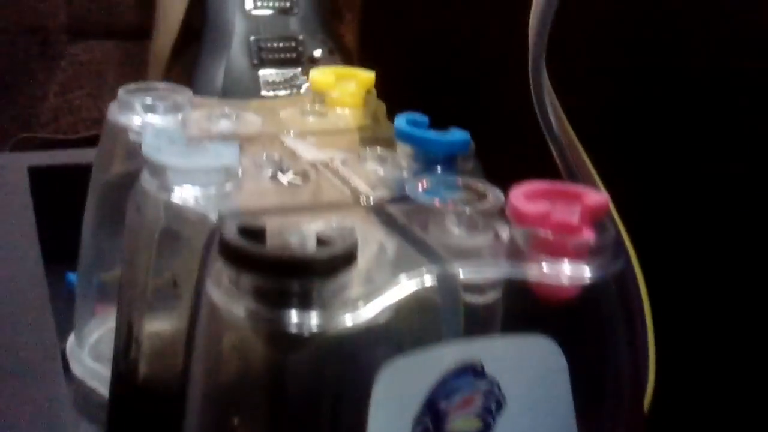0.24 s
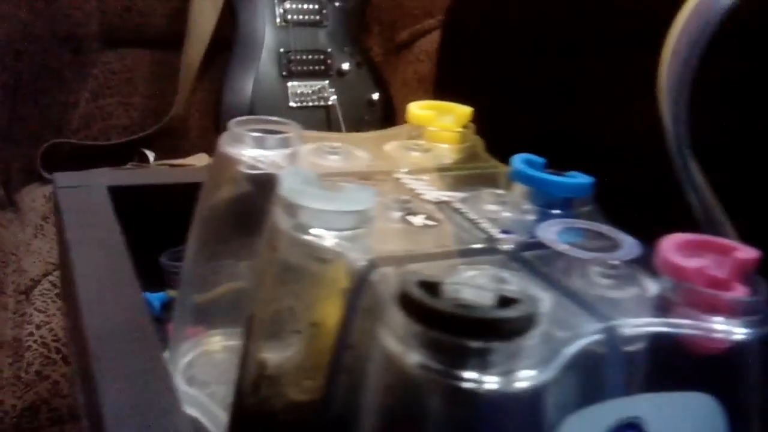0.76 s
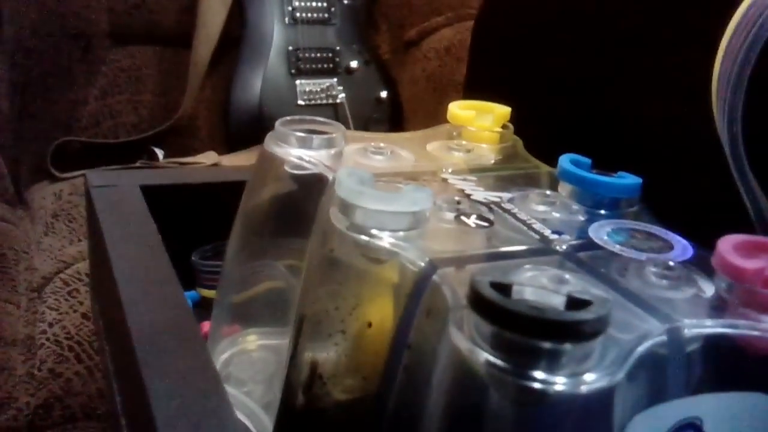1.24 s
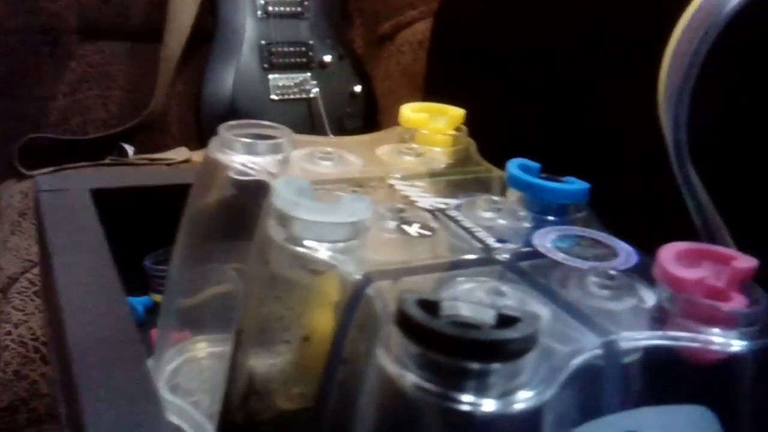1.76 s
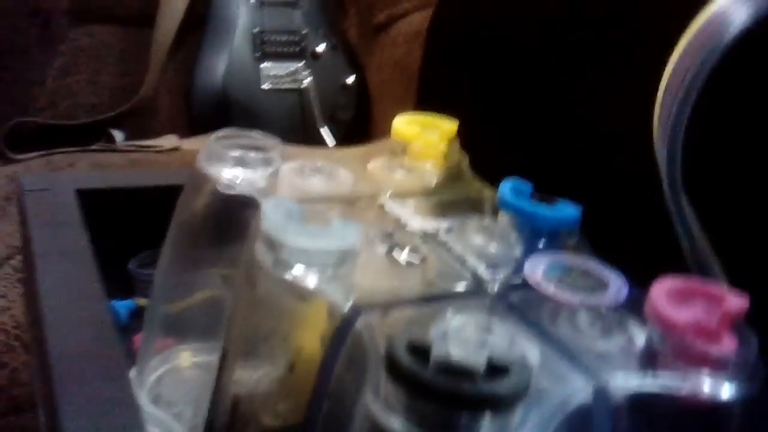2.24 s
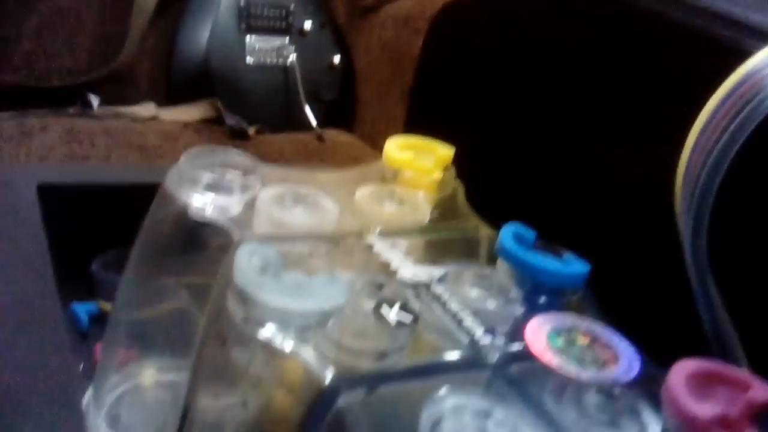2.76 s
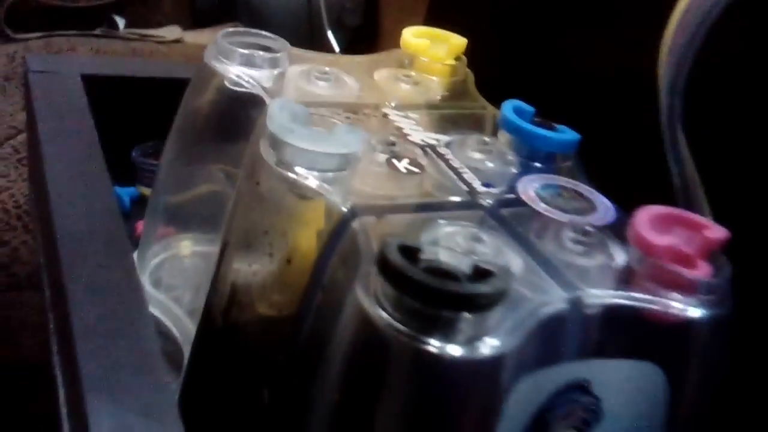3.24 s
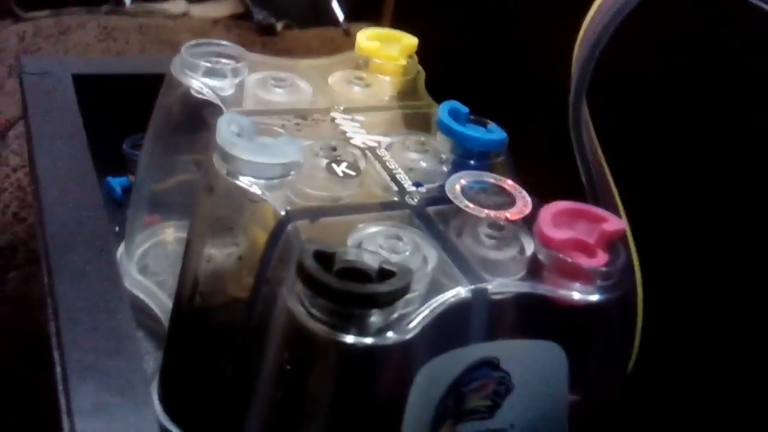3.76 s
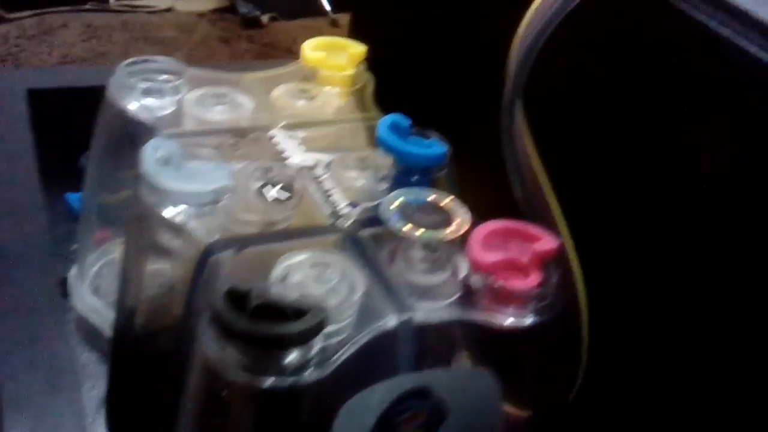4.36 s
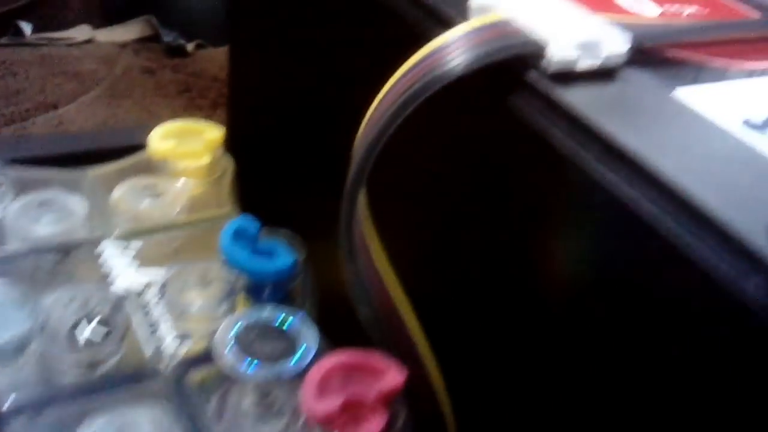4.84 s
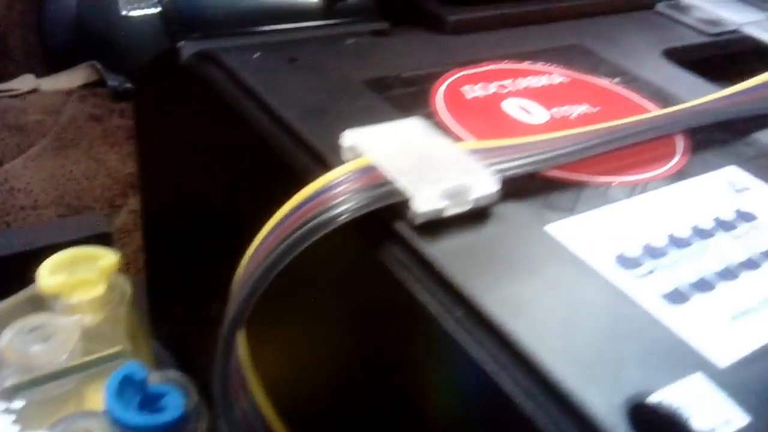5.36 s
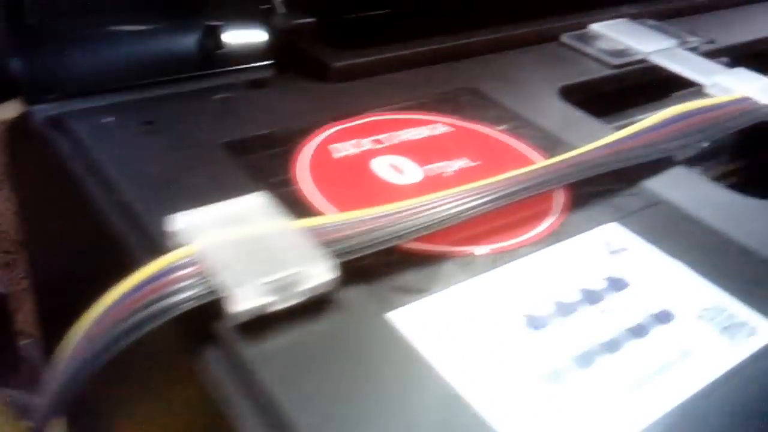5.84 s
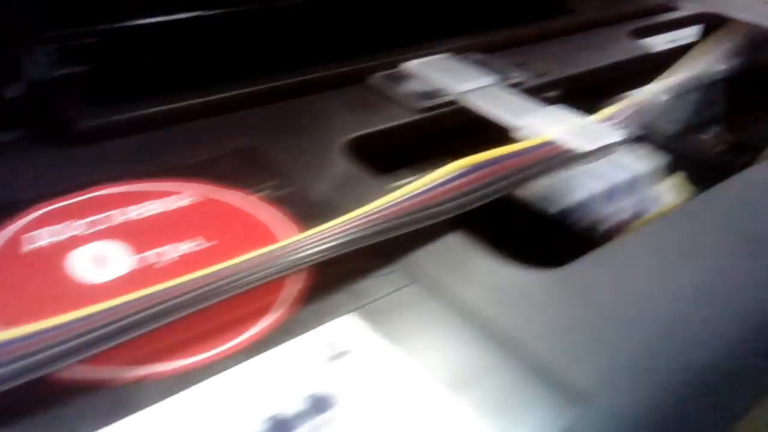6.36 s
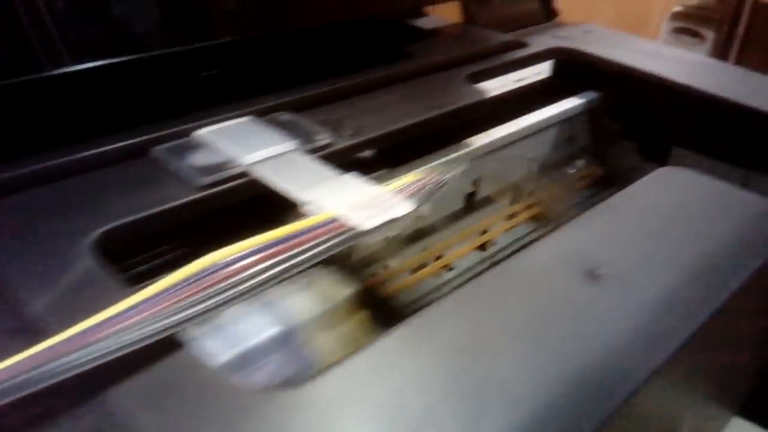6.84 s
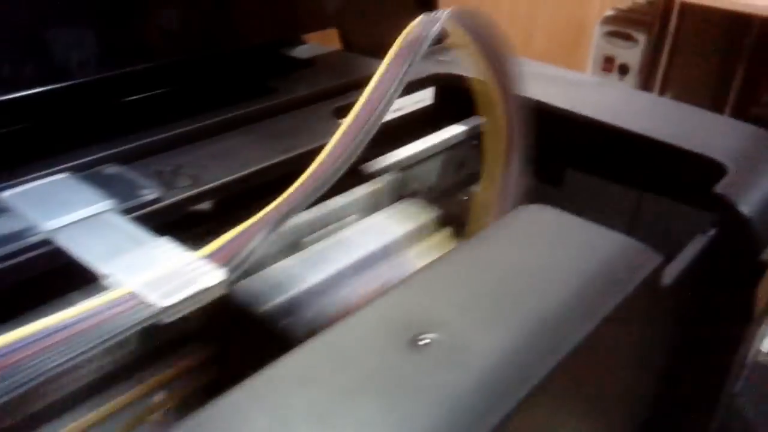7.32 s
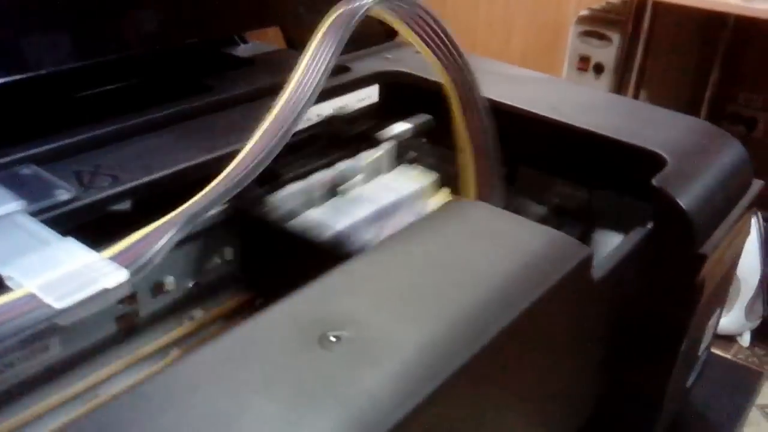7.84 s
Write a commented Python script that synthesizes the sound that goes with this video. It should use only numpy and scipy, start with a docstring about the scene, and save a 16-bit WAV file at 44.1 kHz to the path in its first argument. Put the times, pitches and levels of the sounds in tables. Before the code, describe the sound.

Sharp plastic knocks, hissing rail and whining toothed belt repeat about every two thirds of a second as a printer carriage shuttles, with one short rest.

```python
"""An inkjet printer on a wooden table, heard from close by in a small room; the microphone drifts over its open top.
Each cycle the paper steps on with a chirp, the carriage runs out with a hard knock and a rebound, brakes,
turns, and slides back more slowly. Blows ring decaying casing and carriage modes; the rail hisses as shaped
noise, the toothed belt whines in partials that follow the carriage speed, and the drive rumbles when jolted.
Once the carriage rests, and only a faint hum and low room noise are left."""
import sys
import numpy as np
from scipy import signal
from scipy.fft import rfft, irfft, next_fast_len
from scipy.io import wavfile
from scipy.ndimage import uniform_filter1d

SR = 44100
rng = np.random.default_rng(int(sys.argv[2]) if len(sys.argv) > 2 else 0)


def transcribe(signal):
    """Save signal, clipped to [-1, 1], as a 16-bit WAV file at the path in sys.argv[1]."""
    frames = np.atleast_2d(signal).T
    limited = np.clip(frames, -1, 1)
    pcm = np.round(limited * 32767).astype(np.int16)
    wavfile.write(sys.argv[1], SR, pcm)


N = 356769
TIME = np.arange(N) / SR

# print cycles, timed by the knock on the way out: knock_s, knock_db, carriage_ring_hz,
# crack_db (relative to the knock), chirp_db, brake_db, catch_db; each sound adds its own gain
CYCLES = [(-.0135, -8, 1990, -18, -38, -34, -31.5), (.665, -8, 2000, -15, -32, -33.5, -25.5),
          (1.347, -8.5, 1990, -13, -39, -32, -27), (2.0274, -7, 1990, -5.5, -43.5, -32, -27),
          (2.708, -6, 1971, -8, -44.5, -31.5, -21.5), (3.9302, -6.5, 1976, -2.5, -61, -27, -20),
          (4.609, -8, 1960, -4, -47, -30, -21.5), (5.2903, -7, 1970, -9, -41.5, -29.5, -23),
          (5.971, -7.5, 1868, -7, -44, -29, -24.5), (6.6519, -7.5, 1876, -14, -46, -30, -25.5),
          (7.3329, -9, 1890, -3.5, -54, -30, -24.5), (8.0135, -11, 1744, -23, -51, -28.5, -26)]
# ringing modes of the plastic casing: pitch_hz, level_db, t60_s
CASING_MODES = [(192.7, -13, 0.25), (266.4, -13, 0.21), (319, -5.5, 0.11), (451.5, -8.5, 0.17),
                (559.8, -7.5, 0.19), (605.2, -10.5, 0.23), (781, -13, .14), (893.3, -10, 0.15),
                (949, -13, 0.14), (1136, -13.5, 0.16), (1210, -18, 0.16), (1355, -19, 0.086),
                (1512, -10, 0.085), (1554, -9, 0.17), (2160, -14, 0.095), (2330, -12, 0.086),
                (3227, -18.5, 0.033), (5730, -11, 0.035)]
# ringing modes of the carriage: pitch_ratio (to carriage_ring_hz), level_db, t60_s
CARRIAGE_MODES = [(0.936, -5.5, 0.069), (0.976, -3, 0.038), (1.015, 1.5, 0.034)]
# dense wash of modes under them, before its trim: pitch_hz, level_db, t60_s
MODE_WASH = [(50, -32, 0.16), (90, -37.5, 0.19), (131, -26.5, .22), (206, -19.5, 0.12), (500, -16.5, 0.22),
             (1120, -15, 0.24), (1800, -3.5, 0.061), (2900, -16, 0.11), (4600, -14, 0.088),
             (6490, -4.5, 0.044), (7500, -7.5, 0.031)]
# colour of each kind of blow: level_db at each of these pitch_hz
COLOUR_HZ = [170, 350, 600, 1100, 2000, 3500, 6500]
KNOCK_COLOUR = [0, 0, 0, 0, 0, 0, 0]
REBOUND_COLOUR = [4.5, -0.5, 2.3, 3, -2.8, 1.5, 2]
BRAKE_COLOUR = [6, 6, -1, 7.5, -2, -17, 1]
CATCH_COLOUR = [-10.5, 6, -2.5, -18, -0.5, 0, 3.5]
BUMP_COLOUR = [-0.5, 12, 7.5, -20, -2.5, -4.5, -10]
SWAY_COLOUR = [10.5, -5, -25.5, -32, -54, -45, -39]
FEED_COLOUR = [10, 6.5, 2, -1.5, -12.5, -0.5, -24.5]
# whine of belt teeth and motor, out and back: pitch_ratio (to the tooth rate), level_db
OUT_PARTIALS = [(1, -8), (1.65, -9), (2, -5.5), (4.65, -8.5), (5, -7), (5.35, -9.5), (5.999, -7.5)]
BACK_PARTIALS = [(1, -6), (2, -2), (3, -11), (5, -20), (7, -19.5)]
# relative spectrum of the rail hiss: pitch_hz, level_db
RAIL_SPECTRUM = [(300, -19.5), (800, -14.5), (1300, -0.5), (1900, 1), (2300, -2.5), (2750, -9.5),
                 (3500, 0.5), (4400, 1), (5000, 3), (5700, 5.5), (6300, 4.5), (7000, 9), (7800, 3.5)]
# relative spectrum of the drive rumble: pitch_hz, level_db
DRIVE_SPECTRUM = [(30, -24.5), (85, -34), (125, -11), (180, -0.5), (230, -5), (310, 0.5), (385, -2.5),
                  (450, -0.5), (580, -1), (720, -13.5), (950, -20), (1500, -12), (2600, -35)]
# how near the microphone is to the rail: time_s, lift_db
NEARNESS = [(0, 1), (1.3, 0.5), (3, -0.5), (4.4, 1.5), (6.4, 2.7), (8.1, 0)]
# how far the microphone looks into the open top: time_s, cavity_lift_db
OPENING = [(0, -0.5), (1.5, -4), (3, -6), (4, 0.5), (5, 2.5), (6, 2), (7, 3.5), (8.1, 4)]
# relative spectrum of the room noise: pitch_hz, level_db
IDLE_SPECTRUM = [(18, -56), (30, -28.5), (71, -17.5), (174, -4.5), (282, -9.5), (408, -5.5), (551, -11),
                 (605, -8), (816, -13.5), (1390, -14.5), (2910, -22.5), (5680, -20.5), (7500, -20.5),
                 (9750, -53.5), (16500, -120)]
# the treble falls steeply above 7.2 kHz, leaving faint thin content up to 11.5 kHz: pitch_hz, gain_db
TREBLE_ROLLOFF = [(30, -3.5), (7200, -0.5), (7500, -7), (7750, -27.5), (8000, -36), (8500, -24), (9500, -41.5),
                  (11500, -49)]

# every cycle keeps the same timetable; before the knock: the carriage sets off, the paper feed jerks
SET_OFF_S, FEED_S = .134, .127
# after the knock: the carriage rattles, brakes, turns and rocks the chassis
REBOUND_S, BRAKE_S, TURN_S, SWAY_S = .0595, .149, .186, .206
# after the knock, on the way back: a light catch clicks, the rail bumps, the carriage is home
CATCH_S, BUMP_S, HOME_S = .288, .389, 0.54
# shared event levels, before each sound's own gain
REBOUND_EVENT_DB, BUMP_EVENT_DB, FEED_EVENT_DB = -18.5, -29, -35.5
# the one pause: the carriage runs on to its rest, settles, wakes and bumps off the rest again
PARK_S, SETTLE_S, WAKE_S, UNPARK_S = 3.335, 3.365, 3.742, 3.811
SETTLE_EVENT_DB, WAKE_EVENT_DB, UNPARK_EVENT_DB = -32.5, -59, -29
OUT_TOOTH_HZ, BACK_TOOTH_HZ = 806.6, 611  # belt tooth rate at full speed
OUT_ROUGH, BACK_ROUGH = .45, .27  # how unevenly the belt teeth seat (0-1)
OUT_FADE_DB, BACK_FADE_DB, PARK_FADE_DB = -19, -19.5, -14.5  # whine's fade over a whole stroke
NOTCH_LOW_HZ, NOTCH_HIGH_HZ = 2240, 3200  # band of the whine that the case swallows
CAVITY_DB = -6  # rail hiss ringing inside the case, relative to the direct hiss
HUM_HZ, HUM_DB, IDLE_DB = 604, -71, -61  # centre pitch and level of the hum; rms of the room noise
TOP_HZ = 11500  # upper edge of the channel


def blows(events, colour_db, gain_db, contact_s, build_cycles=1.54, scatter_db=2.5, wash_db=-1.0):
    """Blows ring casing and carriage; parts chatter for the contact time, and low modes build up more slowly."""
    t = np.arange(int(.3 * SR)) / SR
    times, levels_db = np.transpose(events)[:2]
    knock_s, _, ring_hz, *_ = np.transpose(CYCLES)
    wash_hz, wash_level, wash_t60 = np.transpose(MODE_WASH)

    def envelope(hz, t60):
        """Build-up, contact and decay of one mode."""
        rise = 1 - np.exp(-(t * hz / build_cycles) ** 2)
        decay = np.exp(-np.log(1000) * np.maximum(t - contact_s, 0) / t60)
        return undb(on_log_axis(hz, COLOUR_HZ, colour_db)) * rise * decay

    sounds = np.zeros((len(times), len(t)))
    # the wash, in half-octave bands of noise
    for hz in 45 * 2 ** (np.arange(16) / 2):
        noise = band(rng.standard_normal(sounds.size), hz / 2 ** (1 / 4), hz * 2 ** (1 / 4))
        noise = unit(noise).reshape(sounds.shape)
        level = undb(on_log_axis(hz, wash_hz, wash_level) + wash_db)
        sounds += noise * level * envelope(hz, on_log_axis(hz, wash_hz, wash_t60))
    ring = np.interp(times, knock_s, ring_hz)[:, None]
    carriage_modes = [(ratio * ring, db, t60) for ratio, db, t60 in CARRIAGE_MODES]
    # every blow lands a little differently on each mode
    for hz, mode_db, t60 in CASING_MODES + carriage_modes:
        size, detune, phase = rng.standard_normal((len(times), 3)).T[:, :, None]
        tone = np.sin(2 * np.pi * (hz * (1 + 0.0053 * detune) * t + phase))
        sounds += undb(mode_db + scatter_db * size) * envelope(np.mean(hz), t60) * tone
    out = np.zeros(N)
    for s, db, sound in zip(times, levels_db, sounds):
        add(out, s, undb(db + gain_db) * sound)
    return out


def cracks(events, gain_db, decay_s, body_db, bounce_s=0.0053, bounce_db=-6):
    """Hard plastic edges meet in a burst of noise, and once more a moment later."""
    t = np.arange(int(.04 * SR)) / SR
    out = np.zeros(N)
    for s, db in events:
        for lag, drop_db in ((0, 0), (bounce_s, bounce_db)):
            burst = np.exp(-t / decay_s) * rng.standard_normal(len(t))
            add(out, s + lag, undb(db + drop_db + gain_db) * burst)
    return 2 * band(out, 5000, 7300) + 2 * undb(body_db) * band(out, 1700, 2400)


def clatter(events):
    """All the blows of the mechanism, each kind with its own colour, contact time and edge."""
    knocks = blows(events["knocks"], KNOCK_COLOUR, gain_db=-14.0, contact_s=0.0092)
    knocks += cracks(events["edges"], gain_db=-0.5, decay_s=0.0016, body_db=-4.5)
    rebounds = blows(events["rebounds"], REBOUND_COLOUR, gain_db=-15.5, contact_s=0.0077)
    brakes = blows(events["brakes"], BRAKE_COLOUR, gain_db=-11.5, contact_s=0.011)
    catches = blows(events["catches"], CATCH_COLOUR, gain_db=-15.0, contact_s=0.0047)
    catches += cracks(events["catches"], gain_db=-4.0, decay_s=0.003, body_db=0.5, bounce_db=-15.5)
    bumps = blows(events["bumps"], BUMP_COLOUR, gain_db=-11.0, contact_s=0.0046)
    sways = blows(events["sways"], SWAY_COLOUR, gain_db=-10.0, contact_s=0.0085)
    feeds = blows(events["feeds"], FEED_COLOUR, gain_db=-10.5, contact_s=0.0083)
    return knocks + rebounds + brakes + catches + bumps + sways + feeds


def carriage():
    """A fast stroke out and a slower one back; the strokes either side of the pause are longer."""
    knock_s = np.transpose(CYCLES)[0]
    set_off, turn, home = knock_s - SET_OFF_S, knock_s + TURN_S, knock_s + HOME_S
    waking = first_after_pause()
    set_off[waking], home[waking - 1] = WAKE_S, PARK_S
    parking = (TIME >= turn[waking - 1]) & (TIME < PARK_S)
    out = strokes(list(zip(set_off, turn)), OUT_TOOTH_HZ, OUT_PARTIALS, OUT_ROUGH,
                  speed_up_s=.14, slow_down_s=.06, launch=.55,
                  whine_db=-35.0, whine_power=4.0, whine_fade_db=OUT_FADE_DB,
                  rail_db=-35.0, hiss_attack_s=0.13, hiss_release_s=.11, hiss_power=2.35)
    back = strokes(list(zip(turn, home)), BACK_TOOTH_HZ, BACK_PARTIALS, BACK_ROUGH,
                   speed_up_s=.14, slow_down_s=.04, launch=.35,
                   whine_db=-31.0, whine_power=17,
                   whine_fade_db=np.where(parking, PARK_FADE_DB, BACK_FADE_DB),
                   rail_db=-37.0, hiss_attack_s=0.11, hiss_release_s=0.12, hiss_power=1.4)
    return out + back


def strokes(spans, tooth_hz, partials, rough, speed_up_s, slow_down_s, launch, whine_db, whine_power,
            whine_fade_db, rail_db, hiss_attack_s, hiss_release_s, hiss_power, creep_db=-25):
    """Hiss swells and dies with each stroke; the whine follows the carriage speed and fades along the rail."""
    # a smaller launch exponent makes the carriage dart off harder
    speed = ramps(spans, speed_up_s, slow_down_s) ** launch
    travel = np.zeros(N)  # 0 to 1 along each stroke
    for start, end in spans:
        travel += np.where((TIME >= start) & (TIME < end), (TIME - start) / (end - start), 0)
    sliding = ramps(spans, hiss_attack_s, hiss_release_s) ** hiss_power + undb(creep_db) * speed
    whine_level = np.sqrt(sliding) * speed ** whine_power * undb(whine_db + whine_fade_db * travel)
    whine = whine_level * belt_whine(tooth_hz * speed, partials, rough)
    whine = whine - band(whine, NOTCH_LOW_HZ, NOTCH_HIGH_HZ, order=1)
    return whine + undb(rail_db + nearness_db(TIME)) * sliding * rail_hiss(travel)


def rail_hiss(travel, grain_db=1.5, echo=0.23, near_s=.0004, far_s=0.001896, cavity_s=0.0036):
    """The rail catches in tiny uneven steps; the case colours it, and its end-wall echo shifts with the carriage."""
    rub = rng.standard_normal(N) * undb(grain_db * walk(900) + 1.3 * walk(70))
    echo_delay_s = near_s + (far_s - near_s) * travel
    rub = rub + echo * np.interp(TIME - echo_delay_s, TIME, rub)
    t = np.arange(int(.025 * SR)) / SR
    cavity = rng.standard_normal(len(t)) * np.exp(-t / cavity_s)
    rub = rub + undb(CAVITY_DB) * signal.fftconvolve(rub, cavity / np.linalg.norm(cavity))[:N]
    return unit(colour(rub, RAIL_SPECTRUM))


def belt_whine(tooth_hz, partials, rough, flutter=0.00705, waver_db=3.0):
    """The toothed belt and motor sing at multiples of the tooth rate, with flutter and wavering levels."""
    phase = 2 * np.pi * np.cumsum(tooth_hz * (1 + flutter * walk(150))) / SR
    out = np.zeros(N)
    for ratio, db in partials:
        level = np.sqrt(2 / (1 + 2 * rough ** 2)) * undb(db + waver_db * walk(45))
        # teeth seat unevenly, which smears each partial into a narrow band
        smear = 1 + rough * (walk(330) + 1j * walk(330))
        out += level * np.imag(smear * np.exp(1j * ratio * phase))
    return out


def feed_motor(events):
    """Each paper step starts with a short chirp, and the feed gears run down after it."""
    chirps = run_down(events["chirps"], start_hz=880, end_hz=765, glide_s=0.028, decay_s=0.027, gain_db=-1)
    gears = run_down(events["feeds"], start_hz=634.0, end_hz=215.0, glide_s=0.019, decay_s=0.1, gain_db=-10)
    return chirps + gears


def braking_motor(events):
    """The carriage motor's tone drops as it is braked."""
    return run_down(events["brakes"], start_hz=726.6, end_hz=135.1, glide_s=.034, decay_s=.1, gain_db=-10.0)


def run_down(events, start_hz, end_hz, glide_s, decay_s, gain_db, lumpy_db=3):
    """A motor is braked: its tone falls quickly while its level throbs unevenly."""
    t = np.arange(int(.16 * SR)) / SR
    out = np.zeros(N)
    for s, db in events:
        hz = end_hz + (start_hz - end_hz) * np.exp(-t / glide_s)
        hz = hz * (1 + 0.023 * rng.standard_normal())
        swell = (1 - np.exp(-t / 0.0019)) * np.exp(-(t / decay_s) ** 2)
        add(out, s, undb(db + gain_db) * swell * np.sin(2 * np.pi * np.cumsum(hz) / SR))
    return out * undb(lumpy_db * walk(110))


def drive_rumble(events):
    """The drive rumbles whenever it is jolted: by the paper step, the knock, the braking and the catch."""
    shaking = (shudder(events["feeds"], level_db=-43, attack_s=.02, decay_s=0.086)
               + shudder(events["knocks"], level_db=-37, attack_s=0.025, decay_s=0.11)
               + shudder(events["brakes"], level_db=-40.5, attack_s=0.01, decay_s=0.089)
               + shudder(events["catches"], level_db=-45, attack_s=0.0077, decay_s=0.19))
    return shaking * undb(nearness_db(TIME)) * unit(colour(rng.standard_normal(N), DRIVE_SPECTRUM))


def shudder(events, level_db, attack_s, decay_s):
    """Envelope of a shaking that builds up and dies away after each jolt, the same size every time."""
    t = np.arange(int(.4 * SR)) / SR
    out = np.zeros(N)
    for s, _ in events:
        add(out, s, undb(level_db) * (1 - np.exp(-t / attack_s)) * np.exp(-(t / decay_s) ** 2))
    return out


def room(x, t60_s=0.4, wet_db=-13):
    """A small furnished room answers with a short tail of decaying noise."""
    t = np.arange(int(.4 * SR)) / SR
    tail = rng.standard_normal(len(t)) * np.exp(-np.log(1000) * t / t60_s) * (1 - np.exp(-t / 0.0034))
    return x + undb(wet_db) * signal.fftconvolve(x, tail / np.linalg.norm(tail))[:N]


def idle():
    """Room noise and the faint, slightly wandering hum of the powered printer."""
    hum = np.sqrt(2) * np.sin(2 * np.pi * np.cumsum(HUM_HZ * (1 + .004 * walk(22))) / SR)
    noise = unit(colour(rng.standard_normal(N), IDLE_SPECTRUM))
    return undb(IDLE_DB) * noise + undb(HUM_DB + 1.5 * walk(9.6)) * hum


def timetable():
    """Rows of start_s, level_db for each kind of event; each sound adds its own gain."""
    knock_s, knock_db, _, crack_db, chirp_db, brake_db, catch_db = np.transpose(CYCLES)
    near_db = nearness_db(knock_s)
    feeds = paper_steps(FEED_EVENT_DB)
    feeds[first_after_pause(), 1] = WAKE_EVENT_DB
    bumps = each_cycle(BUMP_S, BUMP_EVENT_DB + near_db)
    return dict(feeds=feeds, chirps=paper_steps(chirp_db),
                knocks=each_cycle(0, knock_db), edges=each_cycle(0, knock_db + crack_db),
                rebounds=each_cycle(REBOUND_S, REBOUND_EVENT_DB + near_db),
                brakes=each_cycle(BRAKE_S, brake_db),
                # the harder the carriage brakes, the more the chassis rocks
                sways=np.vstack([each_cycle(SWAY_S, brake_db), (SETTLE_S, SETTLE_EVENT_DB)]),
                catches=each_cycle(CATCH_S, catch_db),
                bumps=np.vstack([bumps, (UNPARK_S, UNPARK_EVENT_DB)]))


def each_cycle(delay_s, level_db):
    """One event a cycle, a fixed time after the knock: rows of start_s, level_db."""
    times = np.transpose(CYCLES)[0] + delay_s
    return np.column_stack([times, level_db + np.zeros(len(times))])


def paper_steps(level_db):
    """The paper steps on ahead of each knock, and earlier after the pause: rows of start_s, level_db."""
    steps = each_cycle(-FEED_S, level_db)
    steps[first_after_pause(), 0] = WAKE_S
    return steps


def first_after_pause():
    """Index of the cycle that starts from rest."""
    return np.searchsorted(np.transpose(CYCLES)[0], WAKE_S)


def nearness_db(s):
    """Level change as the microphone drifts nearer to the rail and away."""
    return np.interp(s, *np.transpose(NEARNESS))


def ramps(spans, rise_s, fall_s):
    """Rises from 0 along a quarter sine, holds at 1 and falls again within each (start_s, end_s) span."""
    out = np.zeros(N)
    for start, end in spans:
        ramp = np.minimum((TIME - start) / rise_s, (end - TIME) / fall_s)
        out += np.sin(np.pi / 2 * np.clip(ramp, 0, 1))
    return out


def walk(rate):
    """Smooth chance with rms 1 that turns about rate times a second."""
    size = max(int(SR / rate), 1)
    steps = np.repeat(rng.standard_normal(N // size + 1), size)
    return unit(uniform_filter1d(steps, size)[:N])


def add(track, s, sound):
    """Mix a sound into the track at time s."""
    start = int(s * SR)
    sound, start = sound[max(-start, 0):], max(start, 0)
    track[start:start + len(sound)] += sound[:max(N - start, 0)]


def band(x, low_hz, high_hz, order=2):
    """Causal band-pass."""
    return signal.sosfilt(signal.butter(order, [low_hz, high_hz], "band", fs=SR, output="sos"), x)


def colour(x, points):
    """Filter by a table of pitch_hz, gain_db."""
    size = next_fast_len(len(x) + 4096)
    hz = np.fft.rfftfreq(size, 1 / SR)
    gain = undb(on_log_axis(hz, *np.transpose(points)))
    return irfft(rfft(x, size) * gain, size)[:len(x)]


def on_log_axis(hz, points_hz, values):
    """Read a table along log frequency."""
    return np.interp(np.log(np.maximum(hz, 1)), np.log(points_hz), values)


def unit(x):
    """Scale to rms 1."""
    return x / np.sqrt(np.mean(x ** 2))


def undb(db):
    """Decibels to gain."""
    return 10 ** (np.asarray(db) / 20)


def scene():
    """The mechanism in the room, its middle band raised or lowered by the view into the open top, over the idle."""
    events = timetable()
    printer = clatter(events) + carriage() + feed_motor(events) + braking_motor(events) + drive_rumble(events)
    lift = undb(np.interp(TIME, *np.transpose(OPENING))) - 1
    printer = printer + lift * band(printer, 830, 1400, order=1)
    return (room(printer) + idle())[None]


def record(dry):
    """The channel cuts the top steeply, leaving only faint thin content above 8 kHz."""
    heard = colour(dry[0], TREBLE_ROLLOFF)
    return signal.sosfilt(signal.ellip(8, .2, 60, TOP_HZ, fs=SR, output="sos"), heard)[None]


dry = scene()
out = record(dry)
transcribe(out)
```